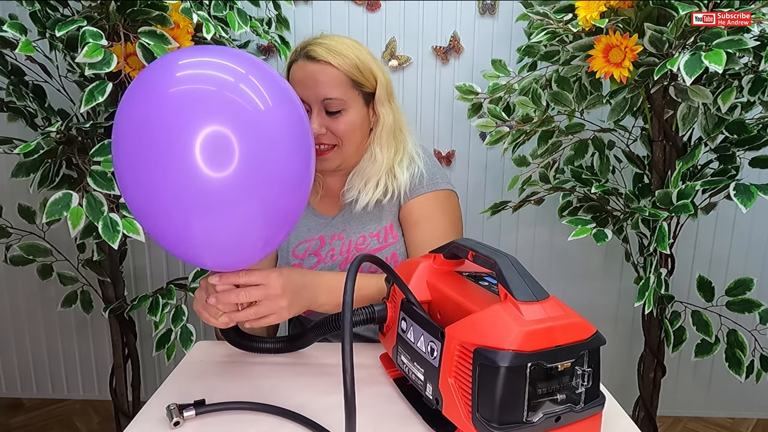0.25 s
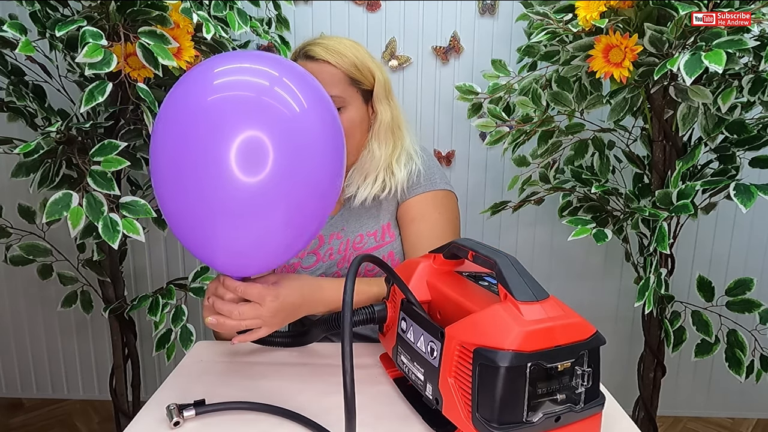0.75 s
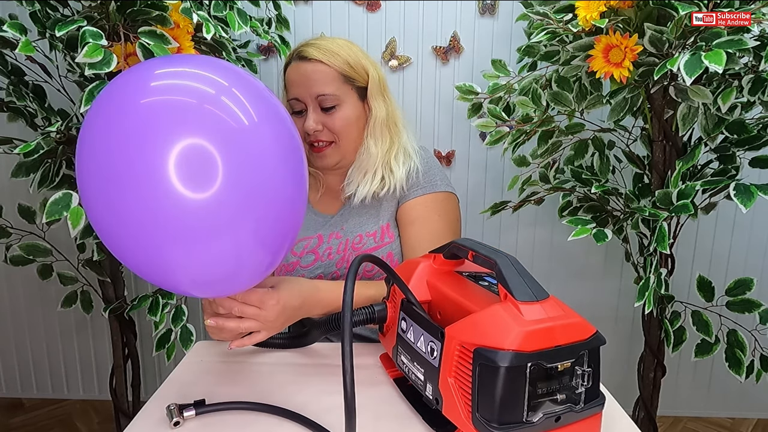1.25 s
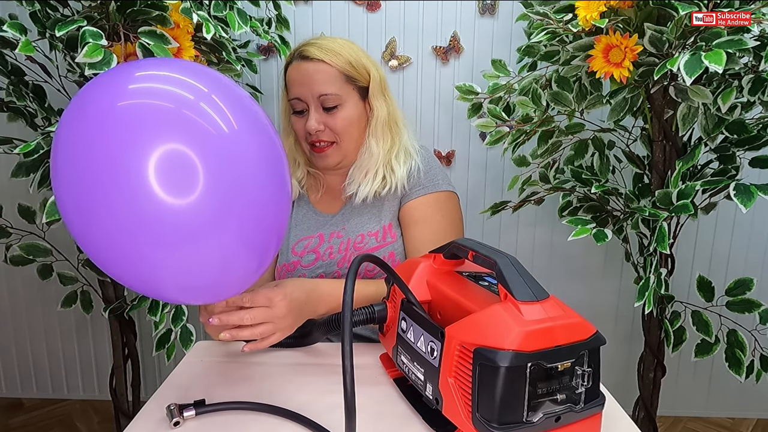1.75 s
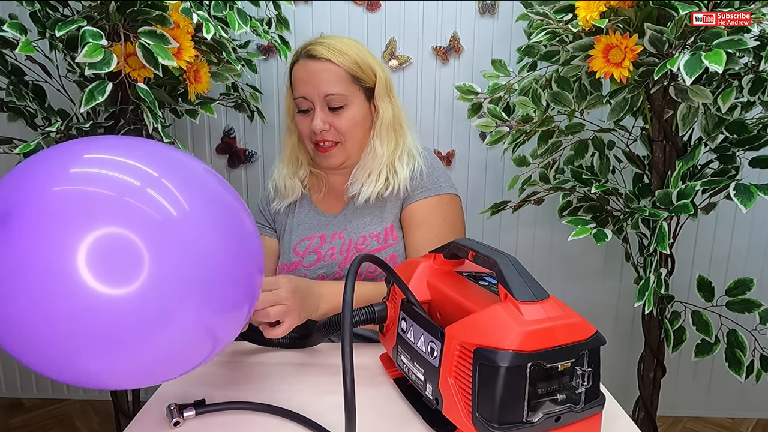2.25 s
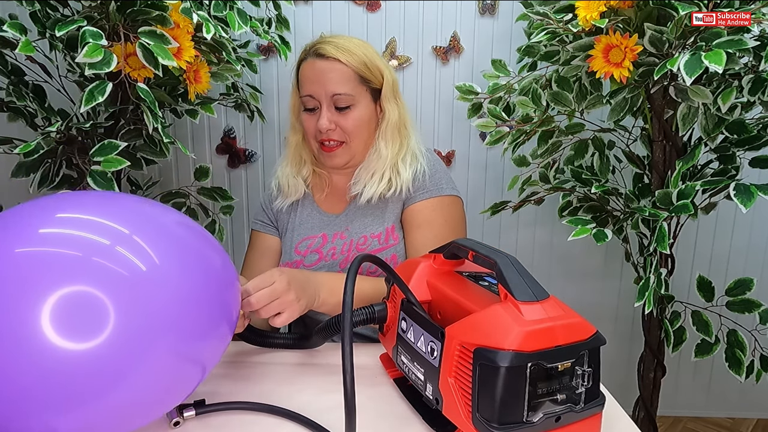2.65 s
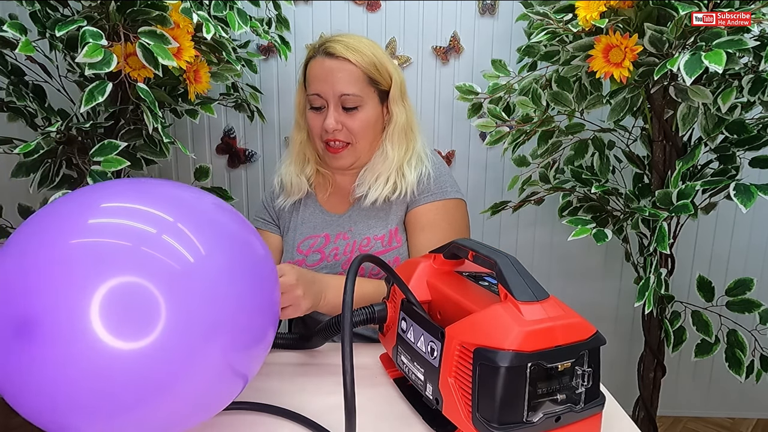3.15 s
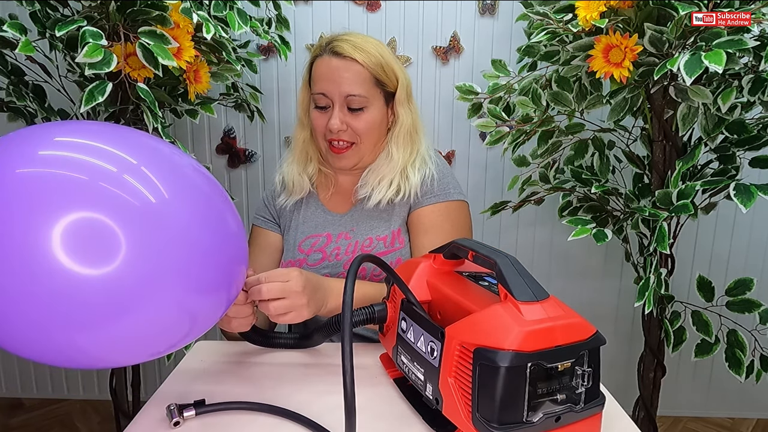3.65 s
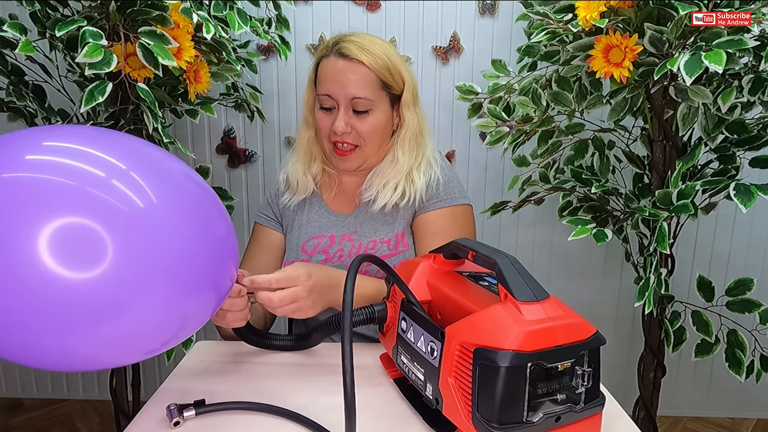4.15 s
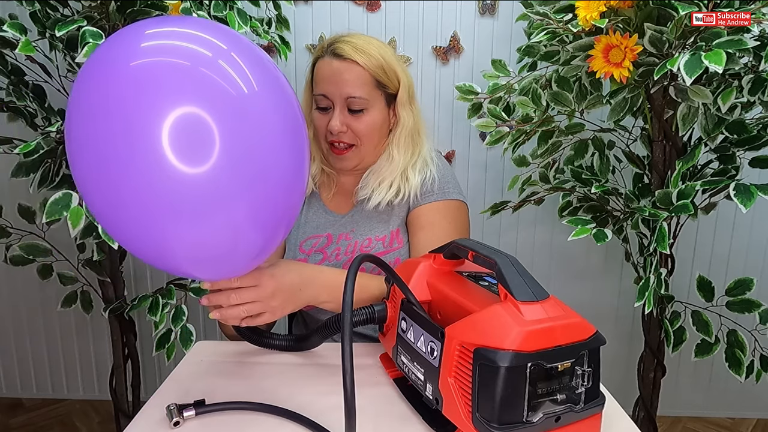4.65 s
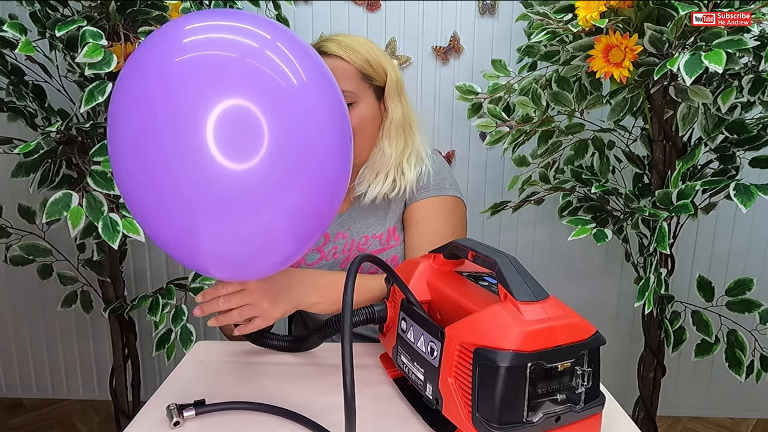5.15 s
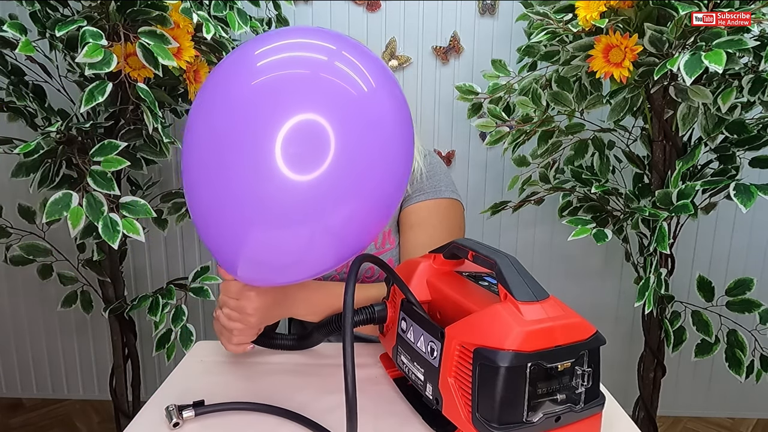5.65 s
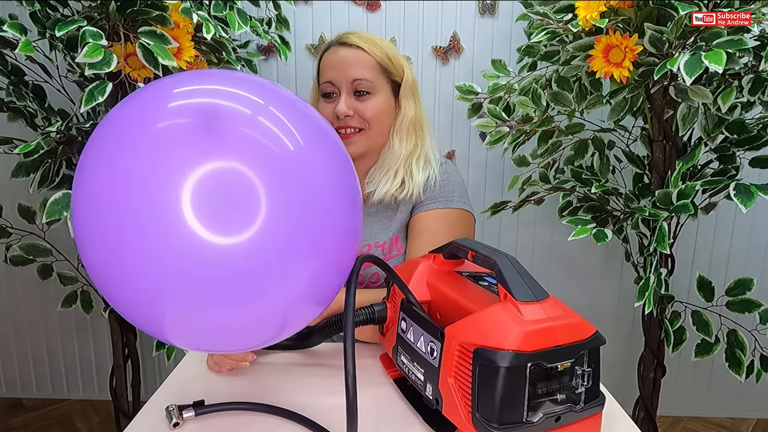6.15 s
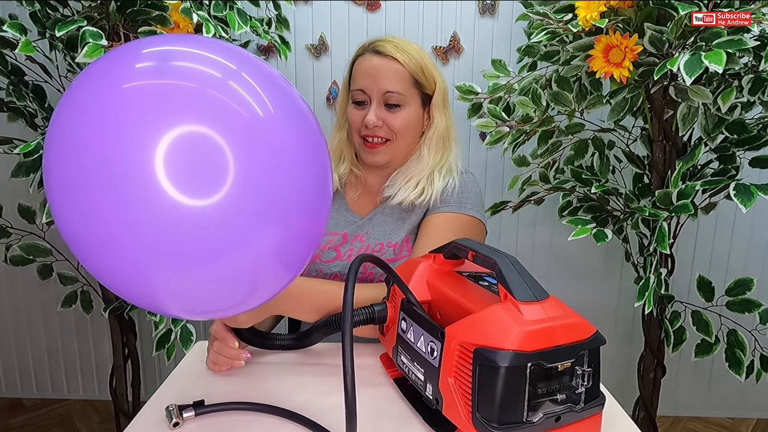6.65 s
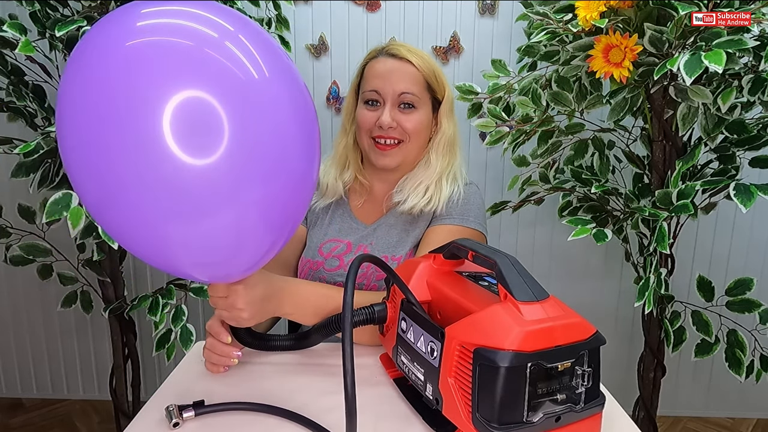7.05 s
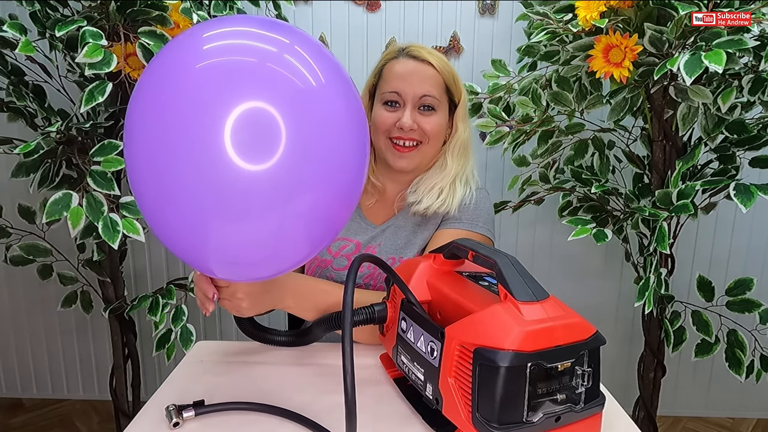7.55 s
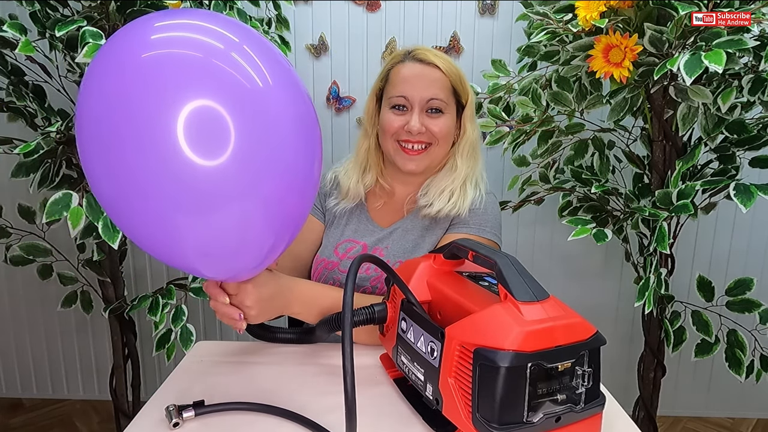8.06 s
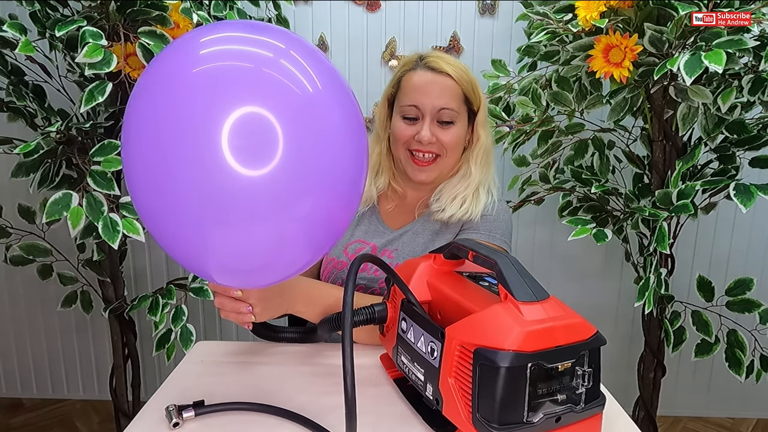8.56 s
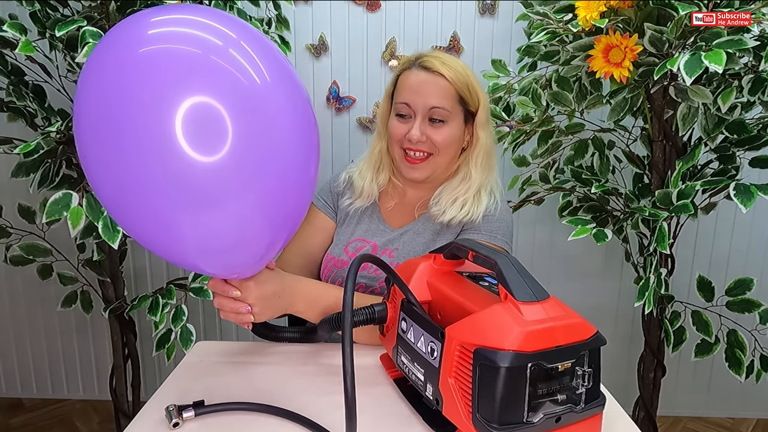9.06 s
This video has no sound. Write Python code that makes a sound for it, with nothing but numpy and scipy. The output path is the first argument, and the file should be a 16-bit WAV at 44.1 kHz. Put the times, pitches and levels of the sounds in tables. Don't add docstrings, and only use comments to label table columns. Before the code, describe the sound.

From 0 to about 9.3 seconds a small electric blower runs continuously, already at full speed. A bright, buzzing high whine, strongest around 8 kHz with a lower tone near 2.7 kHz and a faint hum near 336 Hz, rides on a hollow, resonant roar of air through housing and hose. The opening has a soft air surge and a fine hiss at the nozzle. Around 2 to 4 seconds the balloon swings aside and the whine's tones swell and fade; a faint low table wobble comes near 3.4. Near 4.8 the treble shifts as the balloon swings back. Small low bumps occur around 5.6 and 6.3, with the strongest air surge near 6.5. From 5.8 to 8.3 the skin tightens, subtly changing the roar's colour; pitch rises very slightly and the leak hiss fades. Close microphone, short room reverberation, no ending stop.

```python
import sys
import numpy as np
from scipy import signal
from scipy.fft import rfft, irfft
from scipy.io import wavfile
from scipy.ndimage import uniform_filter1d, map_coordinates

SR = 44100
rng = np.random.default_rng(int(sys.argv[2]) if len(sys.argv) > 2 else 0)


def volts(x):
    e = np.asarray(x, float) / 20
    return 10 ** e


def unload_wav(signal):
    wavfile.write(
        sys.argv[1],
        SR,
        np.round(np.clip(np.atleast_2d(signal).T, -1, 1) * 32767).astype(np.int16),
    )


N = 410571

# (time [s], peak level [dB], pitch [Hz], rise [s], time to fall 60 dB [s])
TABLE_JOGS = [(.1, -67, 8, .03, .8), (1.47, -68, 60, .003, .15), (2.13, -63, 5, .04, 1.2),
              (3.1, -73, 16, 0.054, 1.5), (3.36, -58, 19, .02, .6), (4.85, -71, 40, .01, .4),
              (5.0, -66, 14, .05, 1.5), (5.55, -60, 22, .03, .5), (5.59, -66, 93, .004, .15),
              (5.65, -72, 45, .01, .2), (6.28, -63, 60, .002, .12), (6.275, -54.5, 18, .004, 0.93)]
# (time [s], change [dB])
LEAK_SWELL = [(0, 12), (.6, -9), (1.2, -2), (1.5, 3), (1.8, -12), (2.1, -1.5), (3.2, 6), (4.4, 4),
              (4.8, 1.4), (5.1, -9), (5.4, -1), (5.7, -9), (6.9, -2), (7.5, -11), (7.9, -4), (8.4, -17),
              (9.31, -21)]
# (frequency [Hz], level [dB per Hz])
LEAK_COLOUR = [(8000, -33), (11500, 0), (13500, 0), (16000, -4)]
# (frequency [Hz], level [dB per Hz])
BROAD_ROAR = [(135, -23), (400, -34.5), (750, -10.5), (1200, -20), (2200, -23.5), (4500, -23.5),
              (6500, -26.5), (9000, -25), (10000, -26), (10600, -30.5), (11600, -33), (13000, -32),
              (16000, -36)]
# (frequency [Hz], width [Hz], level [dB], gain once the balloon is taut [dB])
DUCT_MODES = [(229.6, 195, -8, 0), (577, 193, -2.5, 0.5), (1047, 176, -11.5, 5.5), (1315, 48, -14.5, -9),
              (1670, 197, -12, -1), (1678, 12, -1, -2.5), (1996, 58, -13.5, -4), (2455, 110, -19.5, -1),
              (2763, 91, -18.5, 3), (2950, 40, -23, 3), (3350, 110, -17, -13), (3515, 80, -16, -7),
              (3730, 39, -23, 8), (3980, 36, -8.5, 0), (4283, 77, -12.5, -6), (4574, 370, -14, -9.5),
              (5785, 107, -13.5, 2), (5916, 68, -14.5, -3), (7140, 55, -17.5, -2), (7390, 81, -16.5, 3.5),
              (8000, 130, -21, 2), (8480, 870, -20, 2.5), (9160, 110, -19, 0), (10240, 90, -25, 6),
              (11778, 120, -27, 0), (12800, 260, -40, 0)]
# (frequency [Hz], width [Hz], level [dB], gain once the balloon is taut
# [dB])
EXTRA_MODES = [(755, 22, -5, -1), (830, 40, 2, 1), (1400, 38, -6, -1)]
# (start [s], end [s])
TAUT_TIMES = (5.8, 8.3)
# (frequency [Hz], at rest [dB], per unit of clearance [dB], when taut [dB], per unit of surge [dB])
BALLOON_SHADE = [(2180, 1, -1.1, -4.5, 0.8), (3700, -0.5, -1, 1.5, 3.5), (4650, -0.9, -2.7, 1.1, -3.2),
                 (5560, 0, 4.4, 2.2, 1.7), (9700, -2.2, 0.5, -0.2, 5), (14000, -1.5, .3, -5, -3)]
# (time [s], clearance [1])
CLEARANCE = [(0, 0.078), (.3, -0.67), (1.2, -0.12), (1.5, 0.098), (2.1, 0.83), (2.4, .4), (2.85, 0.59),
             (3.3, 0.5), (3.75, 0.44), (4.5, -0.12), (4.8, -1), (5.4, -0.14), (5.7, 0.054), (6.15, 0.27),
             (7.2, 0.27), (7.8, -0.36), (8.7, -0.66), (9.31, -0.19)]
# (time [s], length [s], strength [1])
FLOW_SURGES = [
    (0, .6, 0.79),
    (1.98, 0.12, 0.49),
    (2.3, 0.12, .6),
    (2.85, .2, 0.5),
    (3.3, .5, 0.33),
    (3.72, 0.098, .6),
    (4.3, 0.4, 0.7),
    (5.2, .5, 0.54),
    (6.45, 0.53, .9),
    (8.7, 0.45, .3),
]
# (time [s], turns per second [Hz])
SHAFT_SPEED = [(0, 335.7), (.54, 335.97), (.9, 335.68), (1.08, 336.03), (1.8, 335.72), (2.7, 335.8),
               (3.35, 336.4), (3.78, 335.9), (4.45, 337.28), (5.04, 336.5), (5.4, 337.03), (5.58, 336.62),
               (6.3, 337.03), (6.84, 337.55), (7.02, 337.25), (7.74, 337.77), (8.46, 338.3), (9.31, 338.05)]
# (multiple of the shaft speed [1], level [dB])
SHAFT_TONES = [(1, -57), (2, -68), (3, -65), (4, -70), (5, -68), (6, -77.5), (7, -74), (9, -66),
               (10, -77.5), (11, -77), (12, -84.5), (13, -76.5), (15, -76), (17, -88.5), (20, -83.5),
               (22, -97), (23, -83), (25, -74.5), (26, -95), (28, -83.5), (34, -89), (35, -81), (36, -83),
               (37, -80), (38, -90), (39, -80), (42, -92), (45, -81.5)]
BLADE_LEVELS = [-60.5, -65, -49, -69.5, -70]
BLADE_SHIMMER = [0.7, 1.23, 0.4, 2.47, 2.1]
# (time [s], length [s], change [dB])
BLADE_GLINTS = [(0.17, 0.11, 4.0), (1.24, 0.26, 4.0), (2.65, 0.56, 14.0), (2.65, 0.88, -16.0),
                (4.33, 1.28, 6.0), (4.75, 0.3, -8.0), (5.24, 0.26, -14.0), (5.69, 0.49, 5.0),
                (6.82, 0.19, -13.0), (7.37, 1.01, 3.0), (7.45, 0.12, 4.0), (8.23, 0.1, -6.0),
                (8.5, 0.12, -6.0), (9.21, 0.29, 5.0)]
# (time [s], length [s], change [dB])
THIRD_GLINTS = [(0.12, 0.09, 2.0), (0.25, 0.08, -3.0), (0.64, 0.06, -2.0), (0.93, 0.14, 6.0),
                (1.09, 0.37, -9.0), (1.88, 0.14, -8.0), (1.97, 0.46, 7.0), (2.09, 0.1, -6.0),
                (2.87, 0.75, -12.0), (3.08, 0.94, 13.0), (4.04, 0.16, 3.0), (4.38, 0.1, -4.0),
                (4.63, 0.08, -11.0), (5.28, 0.61, 7.0), (5.41, 0.19, -20.0), (5.8, 0.11, -7.0),
                (6.01, 0.12, -7.0), (6.33, 0.05, -17.0), (6.5, 0.65, -12.0), (6.66, 0.06, -15.0),
                (7.1, 0.9, 9.0), (7.22, 0.29, -24.0), (7.54, 0.1, -8.0), (8.18, 0.1, 2.0),
                (8.82, 0.25, 3.0), (9.3, 0.14, -7.0)]
# (time [s], length [s], change [dB], multiple [1])
WEAK_GLINTS = [(0.04, 0.09, 7.0, 4), (0.3, 0.61, 7.0, 5), (0.33, 0.19, -9.0, 2), (0.55, 0.22, -12.0, 5),
               (0.7, 0.2, 8.0, 2), (0.8, 0.23, 8.0, 4), (1.04, 0.44, -14.0, 2), (2.03, 0.09, -7.0, 5),
               (2.23, 0.69, 10.0, 5), (3.05, 0.47, -7.0, 4), (3.15, 1.4, 14.0, 2), (3.18, 0.39, 4.0, 5),
               (3.22, 0.14, -10, 4), (3.27, 0.75, -17.0, 2), (3.94, 0.22, -9.0, 5), (4.08, 0.15, -13.0, 2),
               (4.68, 1.24, 6.0, 4), (4.88, 0.45, -5.0, 2), (4.92, 0.22, 4.0, 5), (5.36, 0.18, 6, 2),
               (5.8, 0.39, -13.0, 2), (6.57, 0.14, 7, 4), (6.75, 0.29, -8.0, 2), (6.78, 0.09, -10.0, 4),
               (7.18, 0.43, -7.0, 5), (7.21, 0.11, -10.0, 4), (7.43, 0.14, 11.0, 4), (7.57, 1.22, 4.0, 2),
               (8.77, 1.18, -5.0, 4), (8.9, 0.52, -6.0, 5)]


def evened(x):
    return x / np.sqrt(np.mean(x ** 2) + 1e-20)


def drift(rate_hz, count, low_hz=0.111):
    t = np.arange(N // 256 + 2) * 256 / SR
    hz = np.geomspace(low_hz, rate_hz, num=24)[:, None]
    turns = rng.random((count, 24, 1))
    rows = (np.sin(2 * np.pi * (hz * t + turns)) / np.sqrt(hz)).sum(1)
    return [np.interp(np.arange(N) / SR, t, evened(row)) for row in rows]


def swells(t, events):
    s, length, size = np.transpose(events)[:3, :, None]
    return (size * np.exp(-2 * ((t - s) / length) ** 2)).sum(0)


def room(t60, wet_db):
    t = np.arange(SR // 4) / SR
    signs = rng.choice([-1., 1.], len(t))
    hits = rng.random(len(t)) < 2000 / SR
    tail = signs * hits * volts(-60 * t / t60) * (t > .004)
    tail = volts(wet_db) * tail / np.linalg.norm(tail)
    return np.r_[1, tail[1:]] / np.sqrt(1 + volts(wet_db) ** 2)


def table():
    out, t = np.zeros(N), np.arange(SR) / SR
    for s, db, hz, rise, t60 in TABLE_JOGS:
        wobble = volts(db - 60 * t / t60) * (1 - np.exp(-t / rise)) * np.sin(2 * np.pi * hz * t)
        part = out[round(s * SR):][:SR]
        part += wobble[:len(part)]
    return out


def leak():
    level_db = -74.5
    hz = np.fft.rfftfreq(N, 1 / SR)
    f, db = np.transpose(LEAK_COLOUR)
    colour = volts(np.interp(np.log(hz + 1), np.log(f), db, left=-90))
    hiss = irfft(rfft(rng.standard_normal(N)) * colour, N)
    s, swell_db = np.transpose(LEAK_SWELL)
    return volts(level_db + np.interp(np.arange(N) / SR, s, swell_db)) * evened(hiss)


def roar_power(hz, taut):
    f, db = np.transpose(BROAD_ROAR)
    power = volts(np.interp(np.log(hz + 1), np.log(f), db)) ** 2
    for mode_hz, width, db, taut_db in [*DUCT_MODES, *EXTRA_MODES]:
        peak = volts(db + taut_db * taut) ** 2
        power = power + peak / (1 + (2 * (hz - mode_hz) / width) ** 2) ** 1.95
    power = power / (1 + (157.4 / (hz + 1)) ** 12)
    return power + volts(-36.0) ** 2 / (1 + (hz / 300.0) ** 2)


def balloon_shade(hz, t, taut):
    shade_hz, *per_control = np.transpose(BALLOON_SHADE)
    clearance = np.interp(t, *np.transpose(CLEARANCE))
    controls = [1 + 0 * t, clearance, taut, swells(t, FLOW_SURGES)]
    shade_db = np.pad(np.transpose(per_control) @ controls, ((1, 1), (0, 0)))
    shade_hz = np.r_[1300, shade_hz, 17000]
    place = np.interp(np.log(hz[:, 0] + 1), np.log(shade_hz), np.arange(len(shade_db)))
    grid = np.meshgrid(place, np.arange(len(t)), indexing="ij")
    return map_coordinates(shade_db, grid, order=1)


def air():
    level_db = -51.5
    frames, hz = N // 1024 + 5, np.fft.rfftfreq(4096, 1 / SR)[:, None]
    t = np.arange(frames) * 1024 / SR
    taut = np.interp(t, TAUT_TIMES, [0, 1])
    power = roar_power(hz, taut)
    shade_db = balloon_shade(hz, t, taut)
    a, b, patches = rng.standard_normal((frames, len(hz), 3)).T
    patches = uniform_filter1d(patches, size=20, axis=0)
    patches = evened(uniform_filter1d(patches, size=22, axis=1))
    patch_db = 2.04 * patches * np.minimum(hz / 2900.0, 1)
    z = (a + 1j * b) * np.sqrt(power) * volts(shade_db + patch_db)
    return volts(level_db) * evened(signal.istft(z, nperseg=4096, noverlap=3072)[1][:N])


def blade_whine(angle):
    blades = 8
    glints = [(*row, 1) for row in BLADE_GLINTS] + [(*row, 3) for row in THIRD_GLINTS]
    glints = np.array(glints + [tuple(row) for row in WEAK_GLINTS])
    t = np.arange(N) / SR
    coarse = t[::256]
    out = np.zeros(N)
    flickers = drift(60., count=5, low_hz=6.5)
    sways = drift(12., count=5, low_hz=2.5)
    for k, (flicker, sway) in enumerate(zip(flickers, sways)):
        glint_db = np.interp(t, coarse, swells(coarse, glints[glints[:, 3] == k + 1]))
        db = BLADE_LEVELS[k] + glint_db + BLADE_SHIMMER[k] * sway
        flicker = 1 + (0.042 + 0.0067 * k ** 2) * flicker
        out += volts(db) * flicker * np.sin(blades * (k + 1) * angle + k)
    return out


def shaft_tones(angle):
    out = np.zeros(N)
    for (order, db), waver in zip(SHAFT_TONES, drift(8., count=len(SHAFT_TONES), low_hz=0.307)):
        depth_db = .5 + .055 * order
        out += volts(db + depth_db * waver) * np.sin(round(order) * angle + order ** 2)
    return out


def motor():
    t = np.arange(N) / SR
    flutter_hz = .04 * drift(12., count=1, low_hz=2.)[0]
    speed_hz = np.interp(t, *np.transpose(SHAFT_SPEED)) + flutter_hz
    angle = 2 * np.pi * np.cumsum(speed_hz) / SR
    return np.sqrt(2) * (blade_whine(angle) + shaft_tones(angle))


def scene():
    roar = signal.oaconvolve(air(), room(t60=.25, wet_db=-14.))[:N]
    return np.tile(table() + leak() + roar + motor(), (2, 1))


def band_limit(x):
    return signal.sosfilt(signal.butter(12, 15700, fs=SR, output="sos"), x)


def record(dry):
    spells = np.clip(4 * (drift(12., count=1, low_hz=1.5)[0] - .9), .03, 1)
    wobble = evened(uniform_filter1d(rng.standard_normal(N), size=30))
    band = signal.butter(1, [1200., 12000.], "band", fs=SR)
    fizz = evened(signal.lfilter(*band, rng.standard_normal(N)))
    apart = spells * (volts(-31.5) * wobble * dry[0] + volts(-74.0) * fizz)
    return band_limit(dry + np.array([apart, -apart]))


dry = scene()
out = record(dry)
unload_wav(out)
```